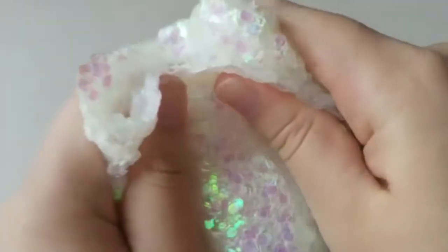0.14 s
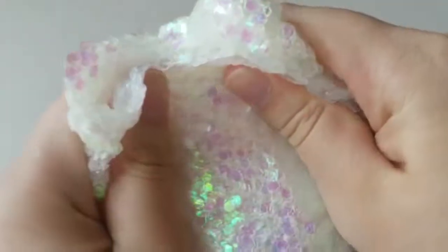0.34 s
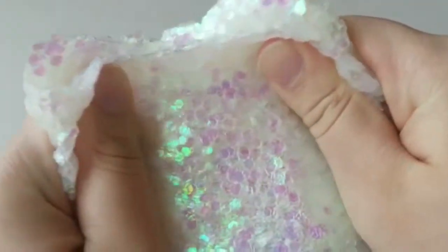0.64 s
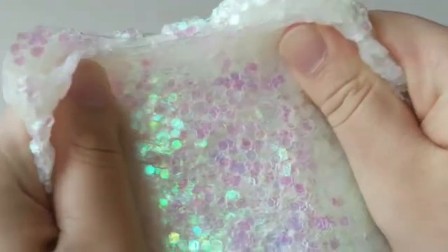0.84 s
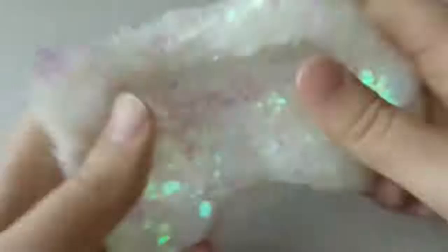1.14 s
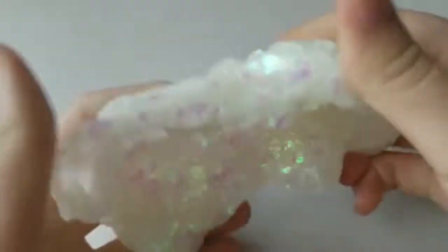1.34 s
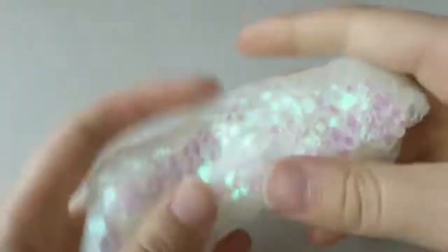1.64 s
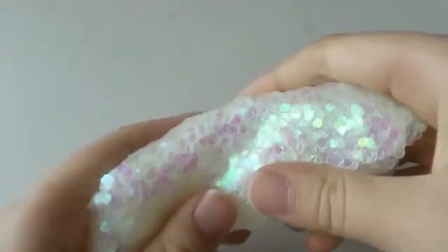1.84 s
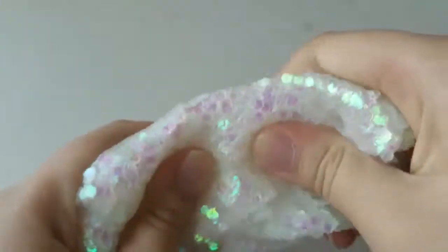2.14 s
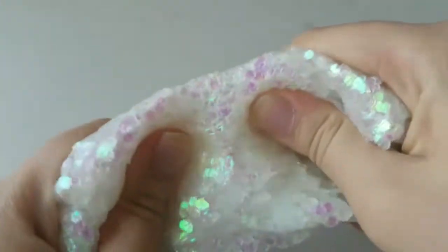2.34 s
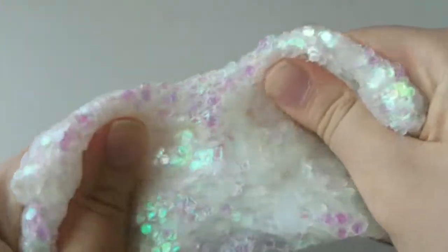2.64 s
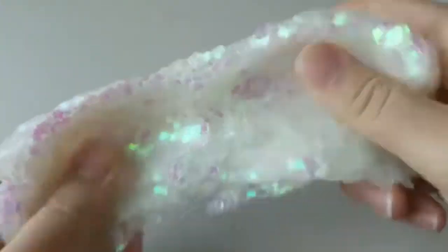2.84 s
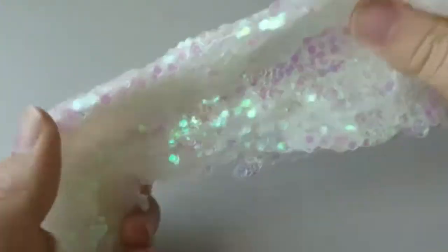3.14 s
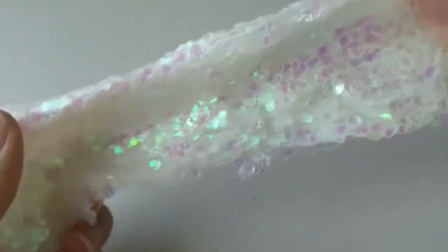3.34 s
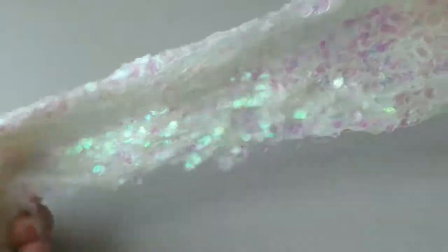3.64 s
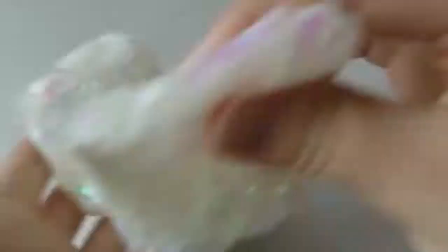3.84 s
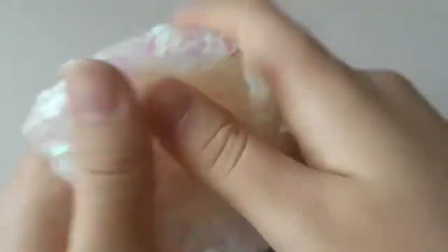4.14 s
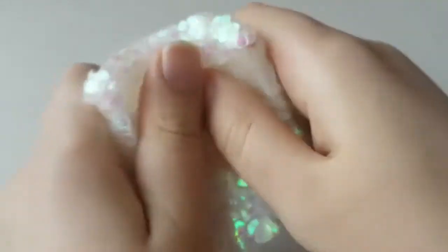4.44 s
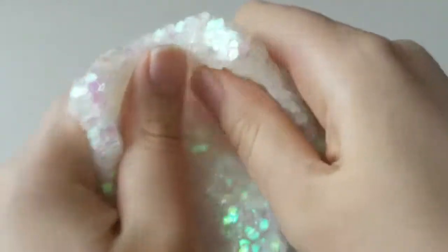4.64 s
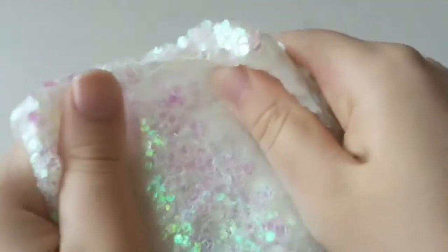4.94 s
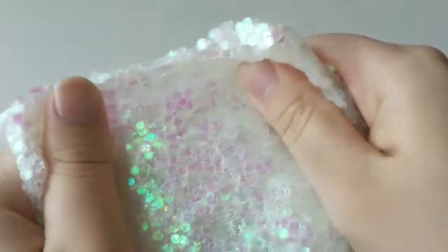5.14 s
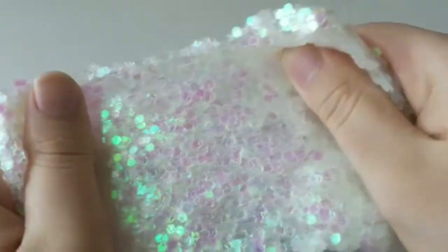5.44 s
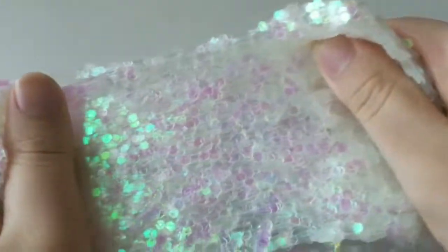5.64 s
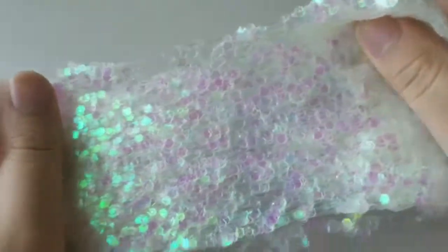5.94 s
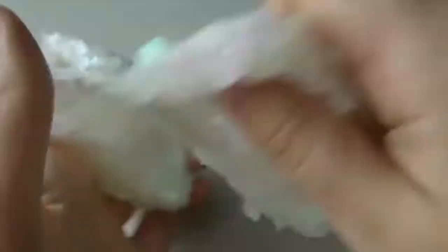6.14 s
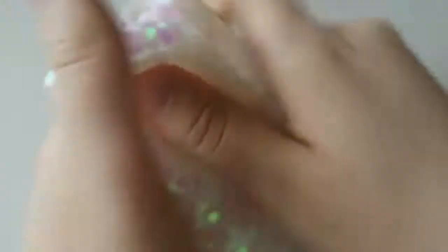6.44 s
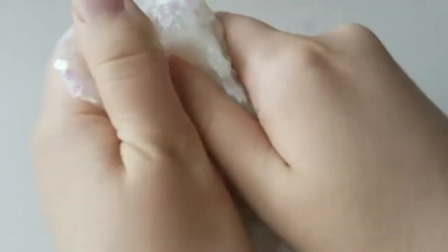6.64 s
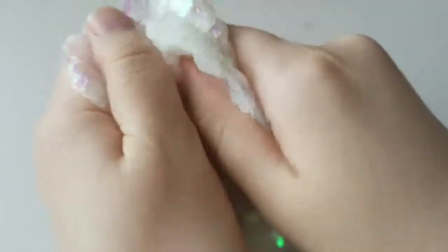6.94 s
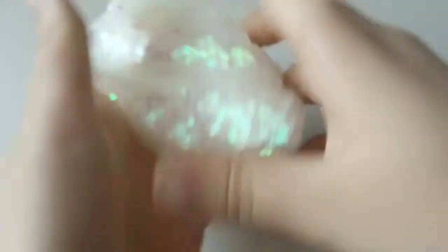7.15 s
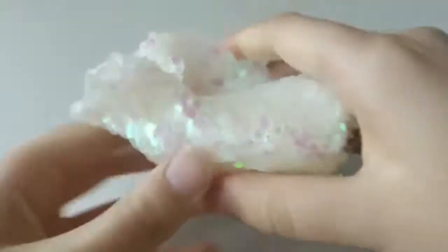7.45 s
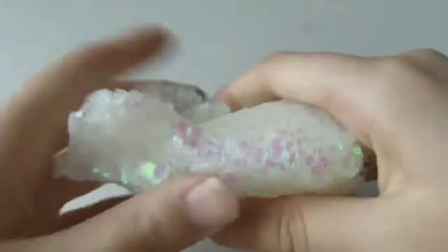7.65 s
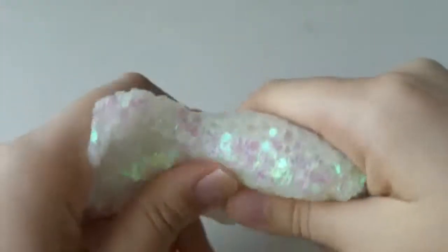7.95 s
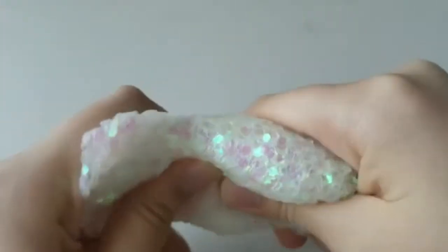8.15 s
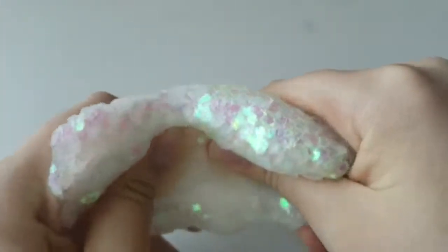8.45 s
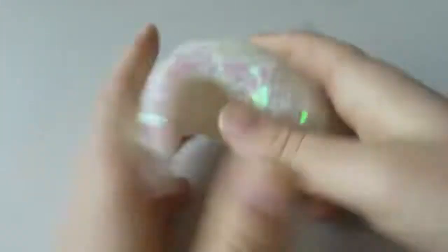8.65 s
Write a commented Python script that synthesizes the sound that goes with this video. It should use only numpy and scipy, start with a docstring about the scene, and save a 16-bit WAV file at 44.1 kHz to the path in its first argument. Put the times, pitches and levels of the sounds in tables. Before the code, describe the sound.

Wet slime is pressed, stretched and folded by hand, giving swarms of tiny crisp bubble clicks with larger hollow pops on top. Bursts alternate with thin, quiet ticking during slow pulls. Fingers peel away with quick dense rasps, and near the end the soft lump thumps dully. Close, dry mono pickup in a small indoor space with faint low rumble and mains-like hum.

```python
"""Wet crackles and pops come in squeezes, over a thin ticking and a low hum: glitter slime kneaded by hand.
Each squeeze is a swarm of tiny bubble clicks, with larger air pockets as short ringing bursts on top.
Some bubbles ring an open hollow; sliding fingers are a dense rasp, and the lump makes dull, sagging thuds.
Weak echoes and a short tail make a small room; rumble, hiss and appliance hum lie behind, all in mono."""
import sys
import numpy as np
from scipy import signal
from scipy.fft import rfft, irfft
from scipy.io import wavfile
from scipy.ndimage import uniform_filter1d

SR = 44100
rng = np.random.default_rng(int(sys.argv[2]) if len(sys.argv) > 2 else 0)


def inscribe(sig):
    """Save sig as 16-bit PCM at rate SR to the path in sys.argv[1].

    A 1-D sig is mono; a 2-D sig holds one channel per row.
    Samples are clipped to [-1, 1] before scaling.
    """
    pcm = np.round(np.clip(np.atleast_2d(sig).T, -1, 1) * 32767)
    wavfile.write(sys.argv[1], SR, pcm.astype(np.int16))


N = 387198  # length in samples
TIME = np.arange(N) / SR  # seconds

# Rumble and hiss. Each row: frequency in Hz, relative strength in dB per Hz.
FLOOR_SPECTRUM = [(15, -18), (35, 3.5), (47, -2.5), (65, 1.5), (88, -9.5), (135, -8), (190, -21.5),
                  (300, -29.5), (420, -35), (800, -37.5), (3000, -41), (8000, -42.5), (12800, -49.5),
                  (14000, -67.5)]
# Appliance hum. Each row: frequency in Hz, level in dB.
HUM_TONES = [(59.5, -50.5), (119.8, -45.5), (220.7, -85), (307, -67.5)]
# How long the room rings. Each row: frequency in Hz, time to fall by 60 dB in seconds.
ROOM_DECAY = [(300, 0.39), (1500, 0.25), (5000, 0.42), (12000, 0.29)]
# Reflections from the walls. Each row: delay in seconds, level in dB.
WALL_ECHOES = [(.0185, -37), (0.034, -30.5), (0.0357, -27.5), (0.061, -39)]
# Soft bumps of the lump and the hands. Each row: start in seconds, level in dB (rms over 25 ms),
# middle pitch in Hz, time to fall by 60 dB in seconds.
SOFT_BUMPS = [(4.21, -55, 520, 0.023), (7.498, -50, 483, 0.11), (7.499, -51, 290, 0.02),
              (7.502, -37, 126, 0.12), (8.342, -52, 480, 0.038), (8.593, -30.5, 125, 0.09),
              (8.601, -64.5, 352.5, 0.093), (8.617, -48.5, 255, 0.056), (8.698, -37, 137.4, 0.22),
              (8.735, -48, 376, 0.14)]
# Fingers sliding and peeling off. Each row: start, rise, hold and release in seconds,
# level in dB before the layer's own level, relative lows in dB, relative highs in dB.
FINGER_SLIDES = [(1.061, 0.038, 0.0035, 0.025, -21.5, -11, -6.5),
                 (1.099, 0.019, 0.073, 0.016, -36, -4, -0.5), (2.781, 0.049, .005, 0.098, -28.5, -4.5, -3),
                 (2.943, .045, .01, 0.054, -35, -3.5, 2), (5.983, 0.05, 0.0046, 0.036, -24, 0.5, 2),
                 (6.027, 0.043, 0.11, 0.061, -33, 4.5, 0), (6.252, 0.04, 0.0058, .03, -40.5, -5, 0),
                 (6.979, 0.032, 0.036, 0.028, -26.5, -0.5, -3.5),
                 (7.11, 0.019, 0.0043, 0.075, -40.5, 3.5, 8), (8.547, 0.02, 0.055, .05, -30.5, 11, 4),
                 (8.652, 0.047, 0.0042, 0.13, -36, 5.5, 6)]
# Basic colour of a slide. Each row: frequency in Hz, relative strength in dB per Hz.
SLIDE_SPECTRUM = [(150, -7), (350, -9.5), (550, -24), (750, -4), (1000, -1), (1400, -4), (2200, -6.5),
                  (3200, 1), (4500, -3), (6500, -3.5), (9000, -8.5), (12500, -29.5), (14300, -52)]
# Hands press or pull the slime. Each row: start, rise, hold and release in seconds, level in dB before
# the layer's own level, weight of big bubbles in dB, weight of tiny bubbles in dB.
HAND_PRESSES = [(0, 0.0033, 0.04, 0.28, -28.5, -1.5, 1.5), (.06, 0.046, 0.18, .15, -36, 1.5, -1.5),
                (.36, 0.061, 0.12, 0.13, -39, -8.5, -1), (.58, 0.1, 0.27, 0.082, -45.5, -10, -1.5),
                (1.035, 0.02, .05, 0.18, -39.5, 0, 10), (1.34, 0.091, 0.016, 0.27, -51, 5.5, 14.5),
                (1.57, 0.071, 0.013, 0.067, -45.5, -1, 7), (1.72, .1, .04, .1, -46, 14, 7),
                (1.82, 0.097, 0.38, .11, -31, 5, 2), (2.27, 0.21, .15, 0.28, -36, -10, -4),
                (2.84, 0.35, 0.13, 0.27, -46.5, -7, 11.5), (3.26, .1, .05, .26, -41.5, -13, 8),
                (3.6, 0.13, 0.1, 0.066, -52.5, 11, 20.5), (3.92, 0.04, 0.0086, 0.032, -57.5, -11, 7),
                (4.2, 0.29, 0.13, 0.34, -30.5, -0.5, -4), (4.69, 0.064, 0.18, 0.57, -41.5, -4, 2),
                (5.48, 0.11, 0.018, 0.061, -47, -3, -4.5), (5.68, 0.14, .03, .04, -51, -3, 1),
                (5.96, 0.016, .29, .05, -48.5, 2, 8), (6.33, 0.18, .05, .1, -43, -7.5, -1),
                (6.48, 0.15, 0.22, 0.073, -28.5, -3, -1.5), (7.1, 0.045, 0.094, 0.067, -54.5, 20, 11),
                (7.41, 0.085, 0.028, .32, -49, 7, 7), (7.675, 0.13, 0.28, 0.3, -34, 5, 4.5),
                (8.15, 0.079, .14, .15, -42, 2.5, 0), (8.53, 0.15, 0.16, 0.19, -38.5, 7, 0)]
# Basic colour of the crackle. Each row: frequency in Hz, relative strength in dB per Hz.
CRACKLE_SPECTRUM = [(200, -23.5), (450, -26), (620, -29), (800, -5), (1000, -0.5), (1270, 0.5), (2000, 0.5),
                    (3700, 2), (4400, -1), (5400, -1.5), (8300, -4.5), (10300, -15), (12900, -30.5),
                    (13900, -41.5)]
# Hollows that open under the thumbs and colour the sound. Each row: start in seconds, length in seconds,
# first pitch in Hz, last pitch in Hz, boost in dB.
THUMB_HOLLOWS = [(0, 0.53, 2480, 2170, 4.5), (0.356, 0.23, 2020, 1830, 9), (0.678, 0.31, 1950, 1950, 6.5),
                 (1.7, .36, 1500, 1330, 6), (2.6, 0.77, 2630, 3020, 2.5), (3.057, 0.45, 3830, 3690, 6.5),
                 (3.624, 0.24, 2400, 2300, 2.5), (4.131, 0.29, 1800, 1240, 11),
                 (4.744, .58, 2460, 2740, 9.5), (5.502, 0.36, 2140, 1790, 2), (6.2, 0.2, 4450, 3950, 9),
                 (6.74, 0.33, 2050, 1880, 4.5), (7.676, 0.22, 4470, 4330, 6), (8.2, 0.4, 2734, 2620, 6.5),
                 (8.592, .25, 1017, 1550, 6.5)]
# Large air pockets bursting. Each row: start in seconds, cavity level in dB, cavity pitch in Hz,
# cavity Q (sharpness of the ring), skin snap level in dB, snap centre in Hz; levels before filtering.
LARGE_POCKETS = [(0.045, -29, 1554, 2.8, -26, 3000), (.053, -26, 1650, 2.4, -20.5, 3200),
                 (0.0585, -17, 1770, 1.1, -45, 3000), (0.0645, -20, 2330, 1.7, -23, 5300),
                 (0.0753, -32, 1290, 2.8, -23.5, 4100), (.129, -17.5, 1900, 1.4, -22, 3300),
                 (.1514, -22, 2390, 1.6, -24.5, 5260), (0.236, -15.5, 1810, 1.6, -21.5, 2650),
                 (0.2627, -25, 2000, 2.8, -52, 4200), (0.2704, -25.5, 1530, 1.1, -50, 7500),
                 (0.2955, -24.5, 1820, 1.6, -29, 2810), (0.3513, -31, 1790, 2.6, -30, 3030),
                 (0.4112, -30, 1870, 1.6, -39, 6400), (.432, -30.5, 1970, 1.4, -52, 5820),
                 (.4472, -31, 1940, 2.2, -51, 6500), (0.4708, -17, 1870, 3.2, -30.5, 6600),
                 (.505, -26, 3200, 0.95, -30.5, 5800), (0.54, -29.5, 1710, 2.2, -32.5, 3300),
                 (.6392, -40, 3150, 1, -34, 6000), (0.6977, -26, 3760, 1.6, -26, 5480),
                 (.7587, -33.5, 1900, 1.1, -54, 6300), (0.7771, -35, 1850, 2, -46, 4400),
                 (0.8012, -30.5, 1860, 2.8, -52, 7100), (.8367, -32, 3200, 1.1, -35.5, 5900),
                 (0.8565, -67, 2230, 4, -35.5, 4260), (0.9174, -36.5, 1930, 5.3, -39, 7400),
                 (0.935, -32.5, 1770, 2.1, -37, 2940), (1.04, -38.5, 2740, 0.64, -37, 6400),
                 (1.443, -50, 7350, 1.4, -43, 7750), (1.6003, -55, 1344, 0.6, -36.5, 5700),
                 (1.7689, -46, 1590, 3.1, -45.5, 5630), (1.8598, -23.5, 1320, 2.8, -21.5, 3960),
                 (1.9319, -25.5, 1390, 2.2, -27, 5800), (1.9357, -27.5, 1410, 1.8, -26.5, 5600),
                 (1.9648, -14, 1260, 1.74, -17, 6800), (1.9932, -16.5, 1350, 1.8, -22.5, 3500),
                 (2.0542, -27.5, 1150, 2.4, -18, 3630), (2.071, -28, 1830, 2.9, -24.5, 6660),
                 (2.0848, -26.5, 1080, 2.6, -22, 3050), (2.215, -23, 1600, 1.6, -32, 6640),
                 (2.2484, -36, 2580, .9, -26.5, 8800), (2.2763, -32, 1340, .9, -23, 6200),
                 (2.3134, -16, 2800, 0.84, -20, 5900), (2.4006, -27.5, 3000, 0.89, -24, 5240),
                 (2.5238, -25.5, 2520, 2.5, -23, 5200), (2.6149, -11, 2350, 1.2, -12, 5260),
                 (2.928, -37, 5570, 2.7, -49, 3000), (3.0374, -38, 5990, 2, -49, 7100),
                 (3.1166, -58, 1680, 1.9, -31.5, 8500), (3.1646, -38.5, 4030, 4.6, -35.5, 6540),
                 (3.2003, -32, 4000, 4.8, -27, 6550), (3.218, -38, 4080, 5.2, -34.5, 5900),
                 (3.373, -32.5, 5270, 2.6, -32.5, 4100), (4.065, -45.5, 4070, 4.4, -69, 6250),
                 (4.392, -30, 1410, 1.3, -33, 3364), (4.49, -25.5, 1550, 1.4, -25.5, 5010),
                 (4.526, -25.5, 1740, 1.5, -37, 6200), (4.5993, -24.5, 2400, 1.7, -20, 3500),
                 (4.6124, -28.5, 2410, 1.8, -43, 4400), (4.717, -21.5, 2140, 0.73, -50.5, 6860),
                 (4.845, -45, 1910, 1.1, -26, 5000), (4.8605, -27, 4850, 1.2, -48, 2950),
                 (4.9208, -36.5, 2040, 0.98, -26.5, 7100), (4.9418, -30, 2190, 0.97, -25, 7430),
                 (4.9752, -22.5, 2390, 3.2, -38, 6830), (5.008, -35, 1500, 0.84, -44, 5370),
                 (5.055, -38, 2000, 1.1, -57, 6200), (5.0663, -37.5, 2130, 1.6, -41, 5400),
                 (5.1323, -38, 2690, 4, -46, 3900), (5.239, -36.5, 1410, 1.2, -33, 3450),
                 (5.571, -41, 2450, 1.3, -49, 7650), (5.5913, -31.5, 2050, 1.7, -38, 6940),
                 (6.0078, -48, 1350, 2, -26, 3500), (6.1467, -38, 1040, 1.4, -24.5, 4200),
                 (6.374, -39, 3960, 1.7, -62, 6700), (6.4142, -50, 1660, 3.9, -36, 3890),
                 (6.5705, -32, 1790, 2.7, -22.5, 3180), (6.6645, -23.5, 1840, 1.7, -27, 6570),
                 (6.6747, -24, 2490, 1.4, -24, 4790), (6.712, -31, 4160, 1.15, -23, 7750),
                 (6.74, -29, 3000, 3.1, -27, 5700), (6.7648, -24, 2950, 1.3, -27, 4720),
                 (6.8118, -19, 2970, 1.6, -21, 5420), (6.8499, -22, 1500, 1.6, -18.5, 5100),
                 (6.855, -22, 1660, 1.8, -24.5, 6900), (6.8828, -26, 1690, 1.2, -20.5, 5800),
                 (6.9106, -31.5, 2460, 1.5, -60, 3000), (6.9752, -40, 2060, 2.8, -40, 6100),
                 (7.696, -45, 823, 1.5, -30.5, 5260), (7.7076, -50, 1190, 0.71, -32, 5900),
                 (7.8244, -26, 2020, 0.94, -16, 6170), (7.8943, -21, 2200, 1.9, -15.5, 5250),
                 (7.923, -25.5, 1440, 1.7, -29, 3450), (7.965, -33.5, 1130, 1.2, -25, 4400),
                 (8.1607, -30.5, 1820, 2.64, -29.5, 5190), (8.1735, -26.5, 1580, 0.95, -35, 5000),
                 (8.2107, -35, 1460, 1.1, -40, 4000), (8.266, -40, 2670, 2, -52, 4660),
                 (8.3448, -25, 1090, .7, -56, 2960), (8.3594, -31.5, 2360, 1.1, -33, 7600),
                 (8.7644, -36, 1710, 4, -27.5, 6400)]

REST_DB = -62.5  # the slime ticks faintly even when only held
RISE_POWER = 1.02  # pressure builds almost evenly
RELEASE_POWER = 1.15  # the fall in dB speeds up a little as the hands let go
RELEASE_DB = 20  # a release lasts until the sound has fallen by this much
SPENT_SHARE = .15  # big bubbles are spent first: their weight falls by this share of the release
HOLLOW_FADE_S = 0.052  # a hollow opens and closes in this time
HOLLOW_OCTAVES = .13  # width of a hollow's resonance
FIZZ_SHARE = .28  # power share of fine fizz at the reference pressure; the rest is separate ticks
TREBLE_HZ, EDGE_HZ = 13400, 16000  # treble cutoff before clipping and final band limit


def amp(db):
    """Turns decibels into a plain amplitude factor."""
    return 10 ** (np.asarray(db) / 20)


def unit(x):
    """Scales to rms 1."""
    return x / np.sqrt(np.mean(x ** 2) + 1e-20)


def read(points, hz):
    """Reads a table along a log-frequency axis."""
    f, value = np.transpose(points)
    return np.interp(np.log(hz + 1), np.log(f + 1), value)


def add(mix, s, sound):
    """Mixes a sound in at time s."""
    part = mix[max(round(s * SR), 0):][:len(sound)]
    part += sound[:len(part)]


def colour(x, spectrum):
    """Gives a sound a fixed spectrum."""
    gain = amp(read(spectrum, np.fft.rfftfreq(len(x), 1 / SR)))
    return irfft(rfft(x) * gain, len(x))


def background(floor_db=-44, waver_rad=0.48):
    """Low rumble and hiss are coloured noise; the hum is sine tones whose phase wavers slightly."""
    out = amp(floor_db) * unit(colour(rng.standard_normal(N), FLOOR_SPECTRUM))
    knots = np.linspace(0, TIME[-1], 30)
    for hz, db in HUM_TONES:
        drift = waver_rad * np.interp(TIME, knots, rng.standard_normal(len(knots)))
        out += np.sqrt(2) * amp(db) * np.sin(2 * np.pi * hz * TIME + drift)
    return out


def room(x, tail_db=-15.5):
    """A few weak wall reflections in a short diffuse tail, which fades at its own pace at each frequency."""
    t = np.arange(SR // 2) / SR
    sparse = rng.random(len(t)) < 8000 / SR
    taps = rng.standard_normal(len(t)) * sparse * (t > .005)
    hz, frames, z = signal.stft(taps, SR, nperseg=256)
    decay = amp(-60 * frames / read(ROOM_DECAY, hz)[:, None])
    tail = signal.istft(z * decay, SR, nperseg=256)[1]
    response = amp(tail_db) * tail / np.linalg.norm(tail)
    response[0] += 1  # the direct sound
    for delay, db in WALL_ECHOES:
        response[round(delay * SR)] += amp(db)
    return signal.fftconvolve(x, response)[:N]


def ring(hz, q, size=1024):
    """Impulse response of a damped cavity with steep skirts, energy 1."""
    b, a = signal.iirpeak(min(hz, .45 * SR), max(q, .6), fs=SR)
    once = signal.lfilter(b, a, signal.unit_impulse(size))
    wave = signal.lfilter(b, a, once)  # the second pass steepens the skirts
    return wave / np.linalg.norm(wave)


def scatter(wave, share=.62, fade_s=.0022, count=14):
    """Palms and desk throw back a few weak copies within milliseconds; energy is kept."""
    delay = rng.uniform(.0004, .007, count)
    size = rng.choice([-1, 1], count) * np.exp(-delay / fade_s)
    copies = share * size / np.linalg.norm(size)
    taps = np.bincount((delay * SR).astype(int), copies, SR // 128)
    taps[0] = 1
    out = np.convolve(wave, taps)
    return out * np.linalg.norm(wave) / np.linalg.norm(out)


def bumps(rise_s=0.0076, sag=0.15):
    """Dull thuds of the soft lump: the pitch sags as it gives way, with an irregular wet squish."""
    out, t = np.zeros(N), np.arange(SR // 4) / SR
    for s, db, hz, t60 in SOFT_BUMPS:
        pitch = hz * (1 + sag * (2 * np.exp(-3 * t / t60) - 1))
        tone = np.sin(2 * np.pi * np.cumsum(pitch) / SR)
        noise = rng.standard_normal(len(t) + 2047)
        squish = unit(signal.fftconvolve(noise, ring(hz, 1, size=2048), "valid"))
        wet = np.interp(hz, [140, 350], [.1, .85])  # the higher thuds are mostly squish
        body = (1 - wet) * np.sqrt(2) * tone + wet * squish
        thud = body * amp(-60 * t / t60) * (1 - np.exp(-t / rise_s)) ** 2
        add(out, s, amp(db) * thud / np.linalg.norm(thud) * np.sqrt(SR / 40))
    return out


def effort(strokes, t, rest_db=-120):
    """Each stroke builds up, holds and dies away; gives level, lows and highs in dB at the times t."""
    start, rise, hold, release, db, lows, highs = np.transpose(strokes)[:, :, None]
    build = np.clip((t - start) / rise, 0, 1) ** RISE_POWER
    letting_go = np.maximum(t - start - rise - hold, 0) / release
    fall_db = RELEASE_DB * letting_go ** RELEASE_POWER
    power = (build * amp(db - fall_db)) ** 2
    total = power.sum(0) + amp(rest_db) ** 2
    # the loudest stroke counts most in the colour
    lows_db = (power * (lows - SPENT_SHARE * fall_db)).sum(0) / total
    highs_db = (power * highs).sum(0) / total
    return 10 * np.log10(total), lows_db, highs_db


def hollow(t):
    """Pitch and boost of the hollow that is open at the times t: it opens, glides evenly and closes."""
    rows = np.array(THUMB_HOLLOWS)
    latest = np.maximum(np.searchsorted(rows[:, 0], t) - 1, 0)
    start, length, first_hz, last_hz, db = rows[latest].T
    opening = np.clip(np.minimum(t - start, start + length - t) / HOLLOW_FADE_S, 0, 1)
    progress = np.clip((t - start) / length, 0, 1)
    return first_hz * (last_hz / first_hz) ** progress, db * opening


def clumps(depth_db, per_s):
    """Bubbles set each other off in little avalanches of a few milliseconds: a random level, mean power 1."""
    knots = np.cumsum(rng.exponential(1, 12000)) / per_s
    heights = np.clip(rng.standard_normal(len(knots)), -2, 2)
    return unit(amp(depth_db * np.interp(TIME, knots, heights)))


def swarm(per_s, spread_db, q, count=20, size=3000):
    """Countless bubbles of many pitches and sizes, evened to a white spectrum and a steady level."""
    sizes = amp(spread_db * np.minimum(rng.exponential(1, N), 3.5)) * rng.choice([-1, 1], N)
    clicks = sizes * (rng.random(N) < per_s / SR)
    kind, out = rng.integers(0, count, N), np.zeros(N)
    for k, hz in enumerate(np.geomspace(600, 12000, count)):
        bubble = scatter(ring(hz, q, size=256))
        out += signal.oaconvolve(clicks * (kind == k), bubble)[:N] * np.sqrt(hz)
    spectrum = rfft(out)
    smooth_power = uniform_filter1d(abs(spectrum) ** 2, 2 * size)
    out = irfft(spectrum / np.sqrt(smooth_power + 1e-9), N)
    power = uniform_filter1d(uniform_filter1d(out ** 2, size), size // 2)
    return out / np.sqrt(abs(power) + 1e-3 * np.mean(out ** 2))


def voice(x, spectrum, strokes, rest_db=-120, low_hz=1800, high_hz=4500):
    """Plays a swarm with the level, lows and highs of the strokes, through the hollow when one is open."""
    hz, t, z = signal.stft(x, SR, nperseg=512, noverlap=384)
    hz = hz[:, None] + 1
    level, lows, highs = effort(strokes, t, rest_db)
    pitch, boost = hollow(t)
    db = read(spectrum, hz) + lows / (1 + (hz / low_hz) ** 6) + highs / (1 + (high_hz / hz) ** 6)
    db = db + boost * np.exp(-.5 * (np.log2(hz / pitch) / HOLLOW_OCTAVES) ** 2)
    gain = amp(db) / np.sqrt(np.mean(amp(db) ** 2, axis=0))  # colour alone leaves the level as it is
    coloured = signal.istft(z * gain, SR, nperseg=512, noverlap=384)[1][:N]
    return coloured * np.interp(TIME, t, amp(level))


def slides(level_db=-2.5):
    """Skin dragging over sticky slime and glitter: a much denser, smoother rasp."""
    rasp = swarm(per_s=9000, spread_db=5.5, q=1.13) * clumps(depth_db=2.5, per_s=200)
    return amp(level_db) * voice(rasp, SLIDE_SPECTRUM, FINGER_SLIDES)


def blips(level_db=-7.0, q=3.2, spread_db=3.5, count=1300):
    """Bubbles that open into the hollow ring it briefly: small wet blips near its pitch."""
    out = np.zeros(N)
    times = (np.arange(count) + rng.random(count)) * TIME[-1] / count
    size, detunes = np.clip(rng.standard_normal((count, 2)), -2, 2).T
    pitch, boost = hollow(times)
    share = np.clip(1 - amp(-boost), 0, 1)  # the stronger the hollow's boost, the louder its blips
    press_db = effort(HAND_PRESSES, times, REST_DB)[0]
    gains = amp(press_db + level_db + spread_db * size) * share * np.sqrt(N / count)
    for s, hz, gain in zip(times, pitch * np.exp(.12 * detunes), gains):
        add(out, s, gain * ring(hz, q, size=256))
    return out


def crackle(level_db=-1.73, full_db=-30, ticks_per_s=1150, thinning=.5, fizz_growth=0.21):
    """The harder the squeeze, the more bubbles burst each second and the more fine fizz fills the gaps."""
    coarse = TIME[::128]
    press_db = effort(HAND_PRESSES, coarse, REST_DB)[0]
    effort_db = np.interp(TIME, coarse, press_db) - full_db  # 0 at the reference pressure
    ticks = swarm(ticks_per_s * amp(thinning * effort_db), spread_db=4.0, q=1.13)
    fizz = swarm(per_s=6000, spread_db=2.5, q=1.3) * clumps(depth_db=4.5, per_s=500)
    foam = np.clip(FIZZ_SHARE * amp(fizz_growth * effort_db), 0, 1)
    both = np.sqrt(1 - foam) * ticks + np.sqrt(foam) * fizz
    return amp(level_db) * voice(both, CRACKLE_SPECTRUM, HAND_PRESSES, REST_DB)


def small_pockets(full_db=-31, pocket_db=-34.5, slope=0.7, spread_db=1.44, pitch_hz=2000,
                  pitch_spread=0.3, octave_db=20, q=2.3, skin_db=-5, skin_hz=5500,
                  chance=.9, thinning=.42, count=400):
    """Lesser pockets burst at random, more often and louder under pressure; rows as in LARGE_POCKETS."""
    place, luck = rng.random((count, 2)).T
    size, tune, snap, snap_tune = np.clip(rng.standard_normal((count, 4)), -2, 2).T
    times = (np.arange(count) + place) * TIME[-1] / count
    level, lows, highs = effort(HAND_PRESSES, times, REST_DB)
    hollow_hz, boost = hollow(times)
    # pockets are higher where tiny bubbles prevail, and lean to the pitch of an open hollow
    own_hz = pitch_hz * 2 ** ((highs - lows) / octave_db) * np.exp(pitch_spread * tune)
    free = amp(-boost)
    cavity_hz = own_hz ** free * hollow_hz ** (1 - free)
    cavity_db = pocket_db + slope * (level - full_db) + spread_db * size
    snap_db = cavity_db + skin_db + spread_db * snap
    snap_hz = skin_hz * np.exp(pitch_spread * snap_tune)
    rows = np.transpose([times, cavity_db, cavity_hz, np.full(count, q), snap_db, snap_hz])
    return list(rows[luck < chance * amp(thinning * (level - full_db))])


def pops(cavity_db=0, snap_db=0, soft_hz=10500, thin_hz=650, push_db=-28, push_hz=340):
    """The skin of a pocket snaps and its cavity rings briefly; row levels are rms over 5 ms, unfiltered."""
    out, pushes = np.zeros(N), np.zeros(N)
    for s, db, hz, q, skin_db, skin_hz in LARGE_POCKETS + small_pockets():
        cavity = amp(db + cavity_db) * ring(hz, q)
        snap = amp(skin_db + snap_db) * ring(skin_hz, 1.69)
        add(out, s, scatter(cavity + snap))
        # a wide-open pocket (low Q) also shoves the air
        add(pushes, s, amp(db + push_db) / q * ring(push_hz, 0.52))
    # small pockets radiate little bass, and the wet skin rounds off the top
    band = [thin_hz, min(soft_hz, .45 * SR)]
    out = signal.sosfilt(signal.butter(3, band, "band", fs=SR, output="sos"), out)
    return (out + pushes) * np.sqrt(SR / 200)


def scene():
    """The slime in its room plus the background, the same in both channels."""
    slime = bumps() + slides() + blips() + crackle() + pops()
    mono = background() + room(slime)
    return np.array([mono, mono])


def record(dry):
    """A steep low-pass dulls the top treble and peaks are clipped; then come band limit and edge fades."""
    dulling = signal.firwin(101, TREBLE_HZ, window=("kaiser", 6), fs=SR)
    lowpass = signal.firwin(511, EDGE_HZ, window=("kaiser", 9), fs=SR)
    clipped = np.clip(signal.oaconvolve(dry, dulling[None], "same"), -.95, .95)
    return signal.oaconvolve(clipped, lowpass[None], "same") * signal.windows.tukey(N, .001)


dry = scene()
out = record(dry)
inscribe(out)
```